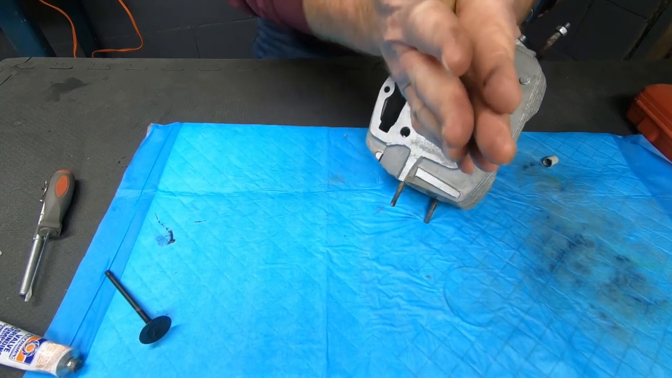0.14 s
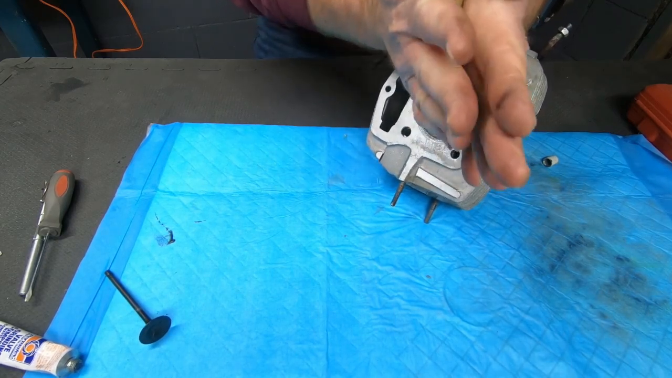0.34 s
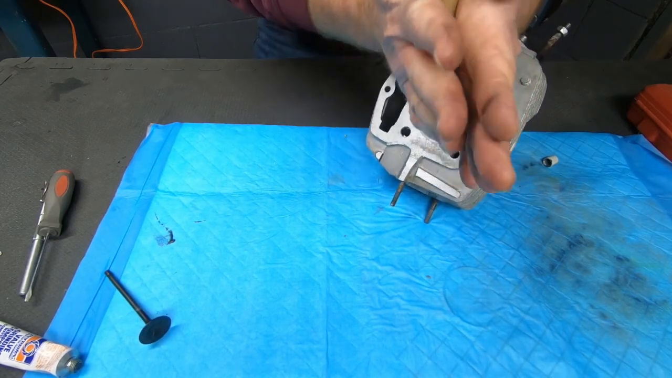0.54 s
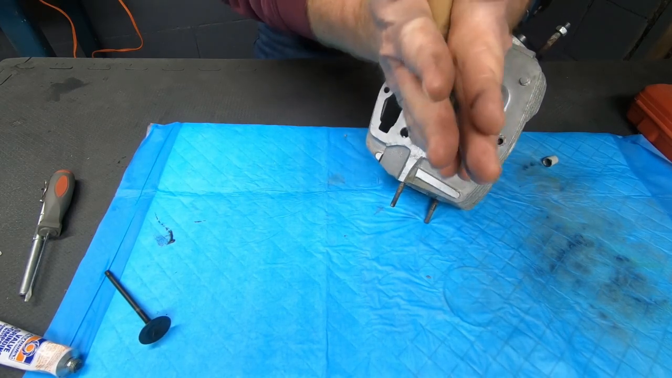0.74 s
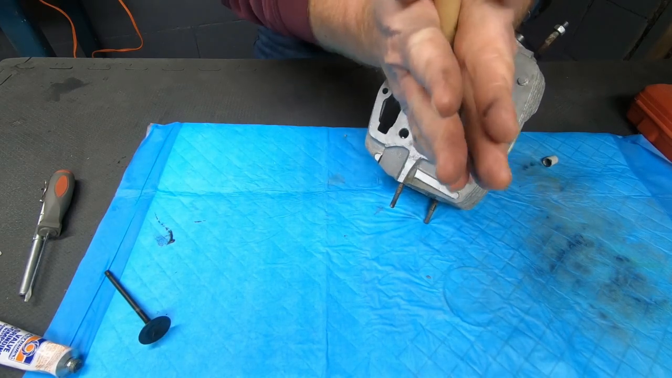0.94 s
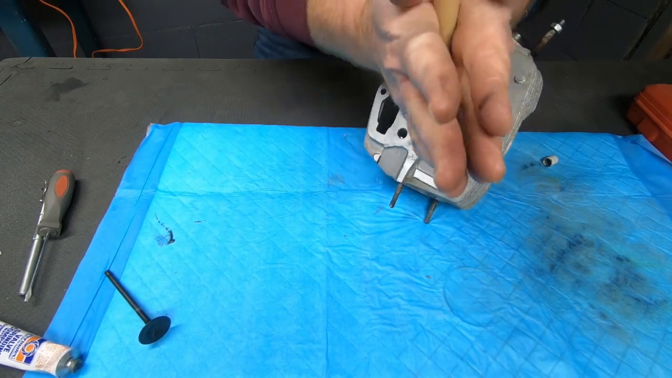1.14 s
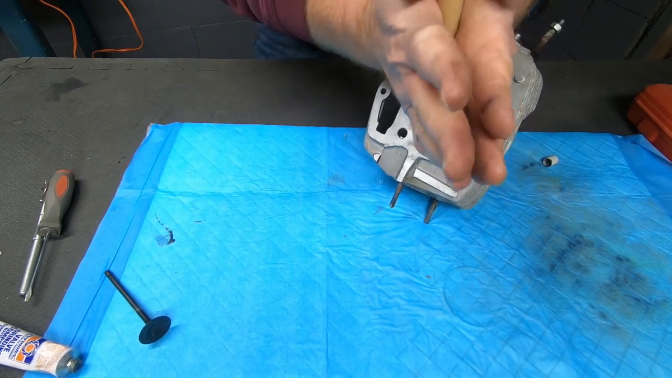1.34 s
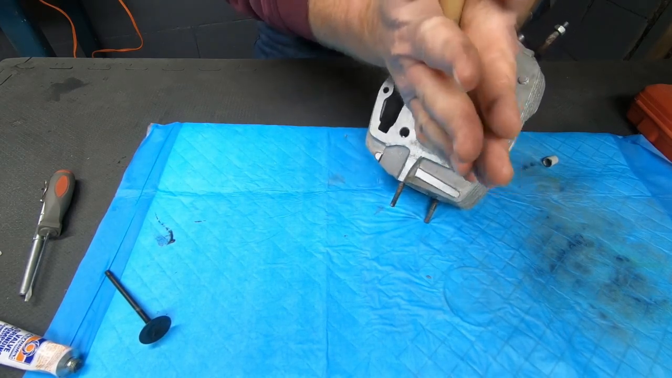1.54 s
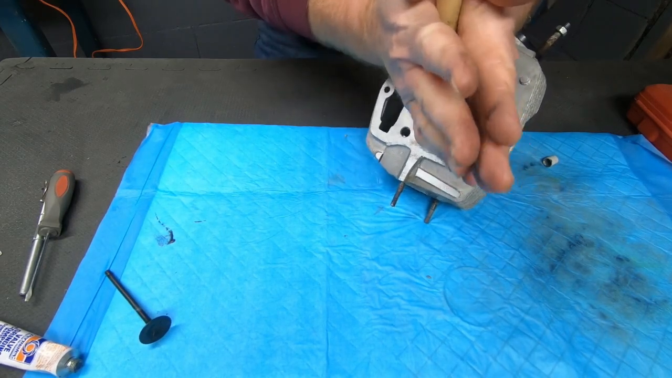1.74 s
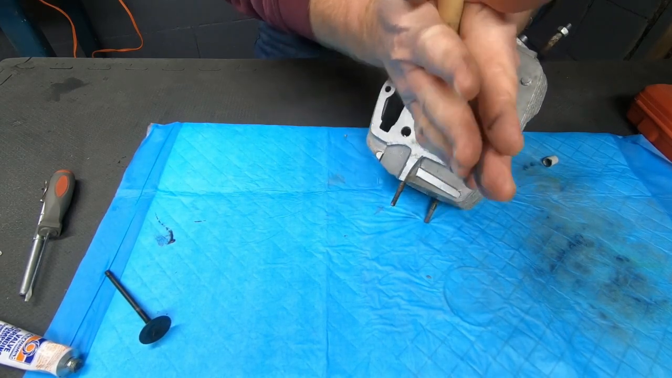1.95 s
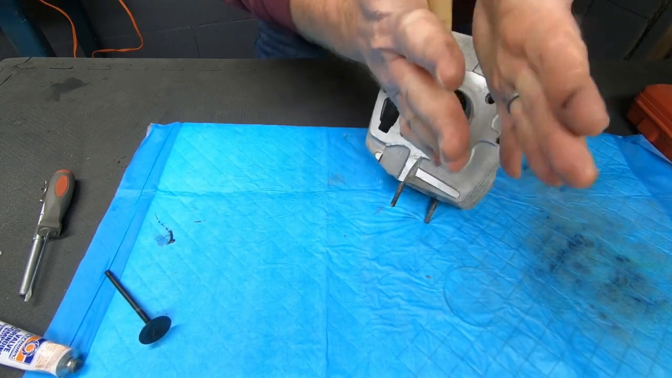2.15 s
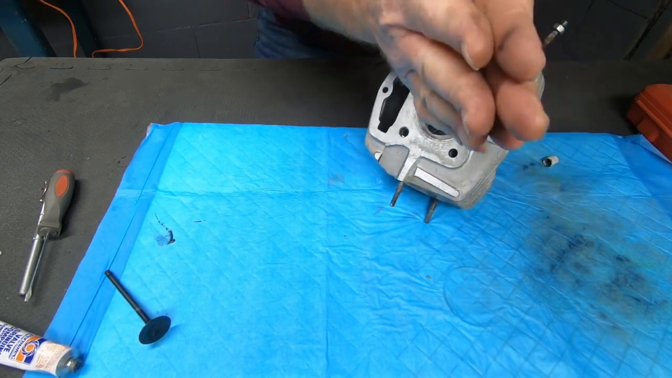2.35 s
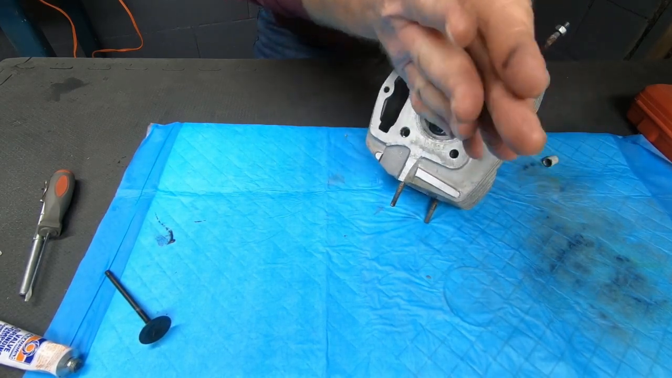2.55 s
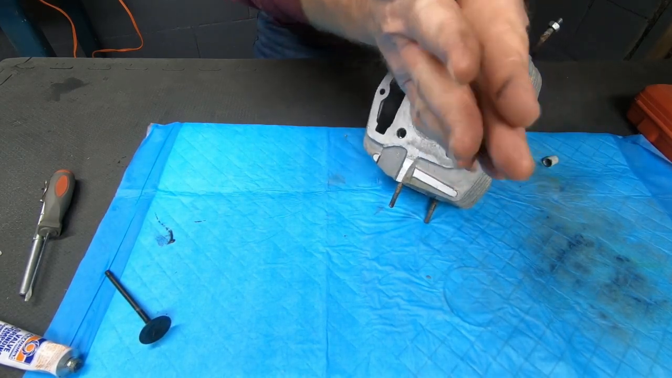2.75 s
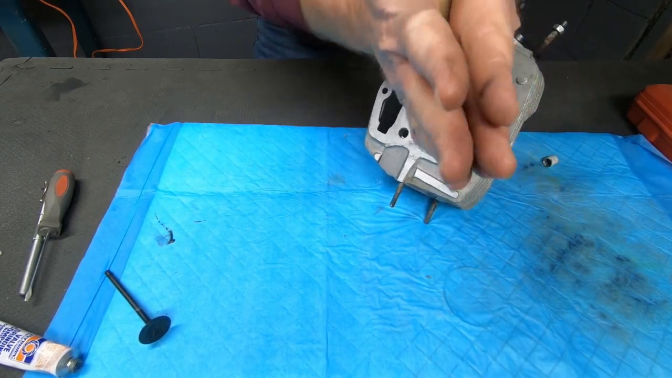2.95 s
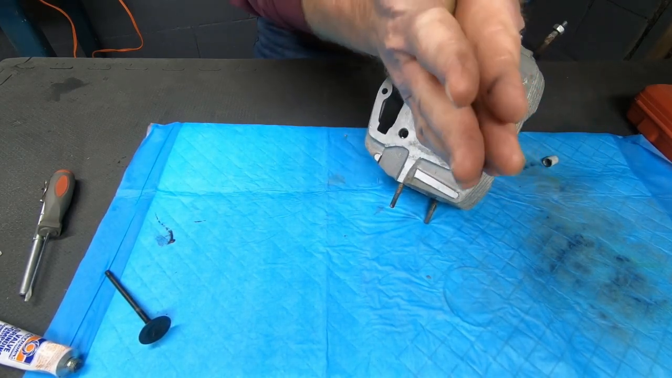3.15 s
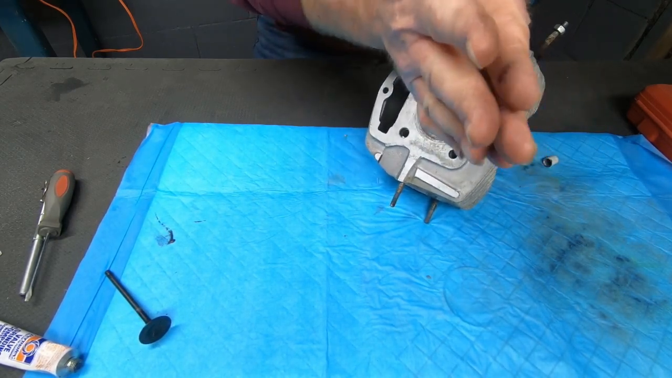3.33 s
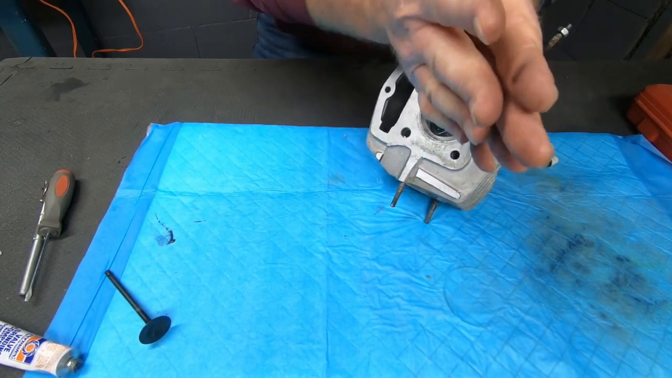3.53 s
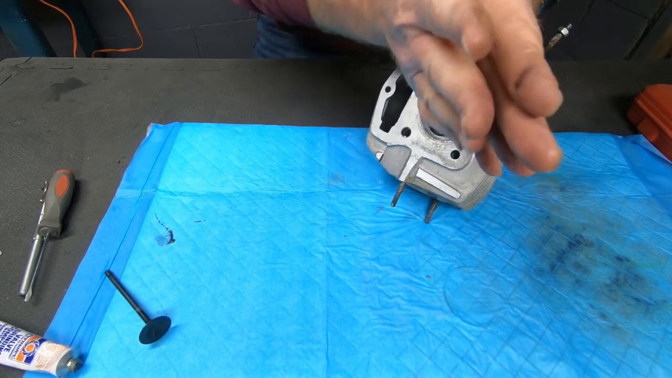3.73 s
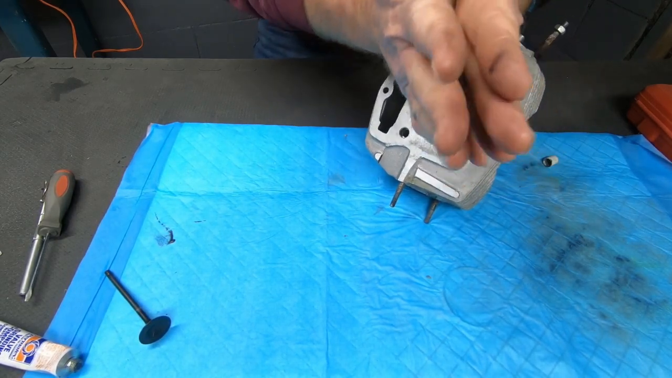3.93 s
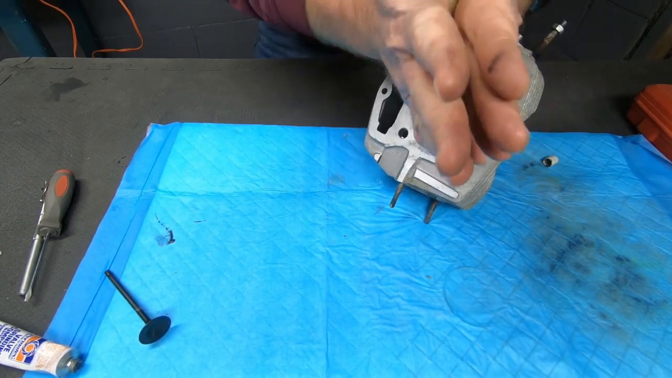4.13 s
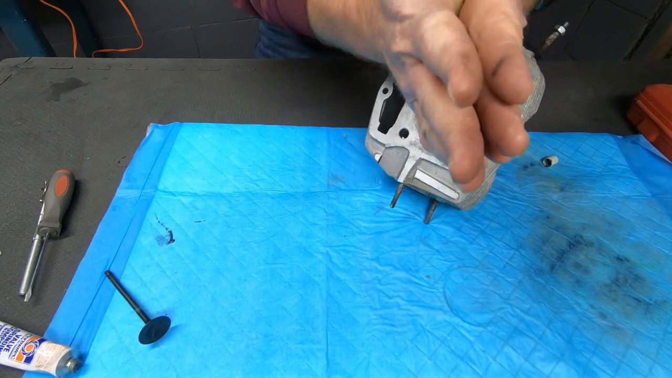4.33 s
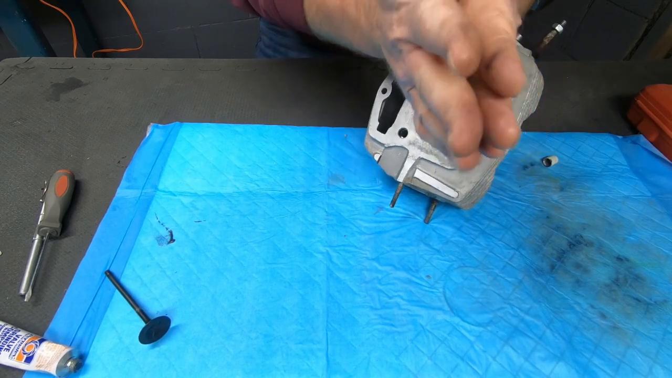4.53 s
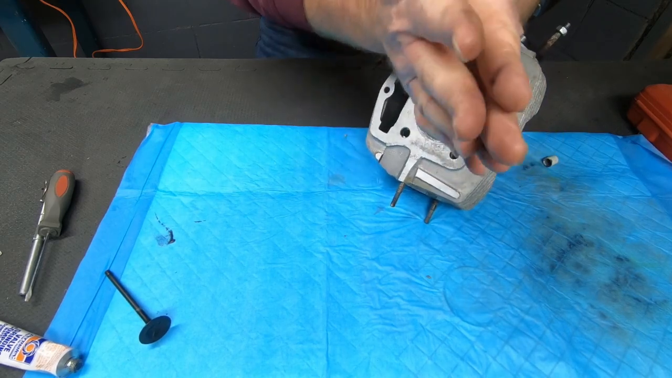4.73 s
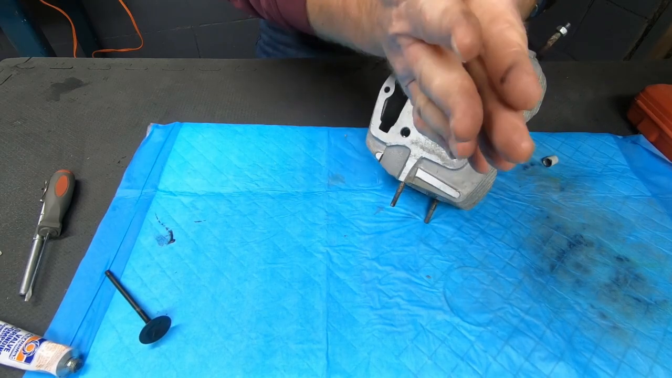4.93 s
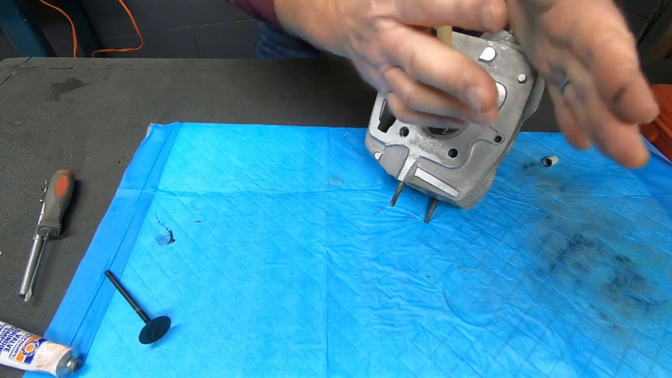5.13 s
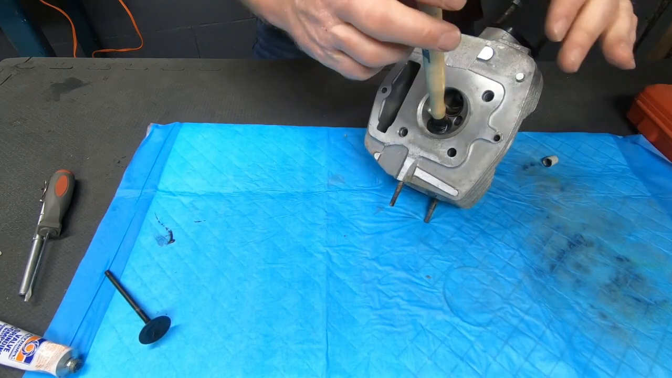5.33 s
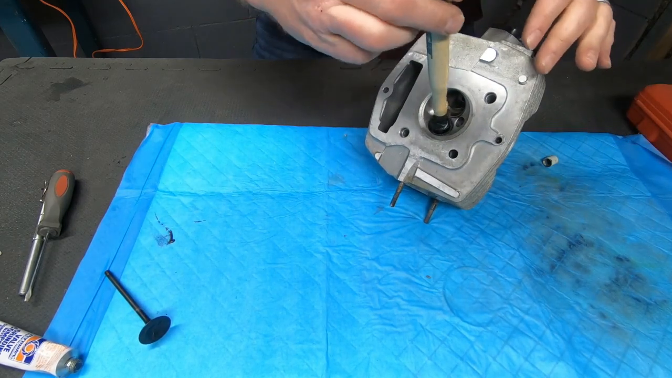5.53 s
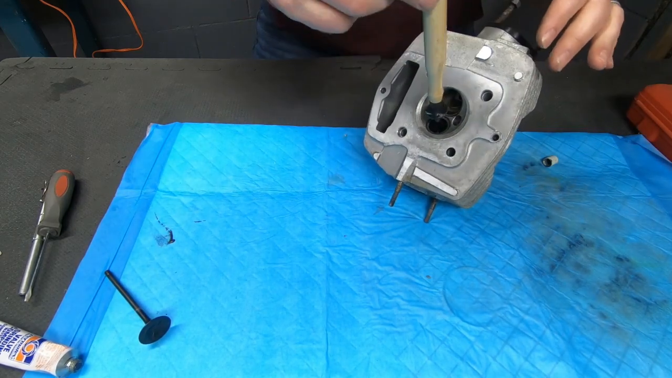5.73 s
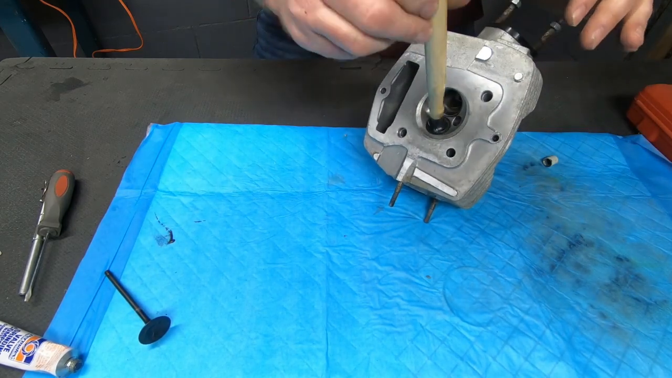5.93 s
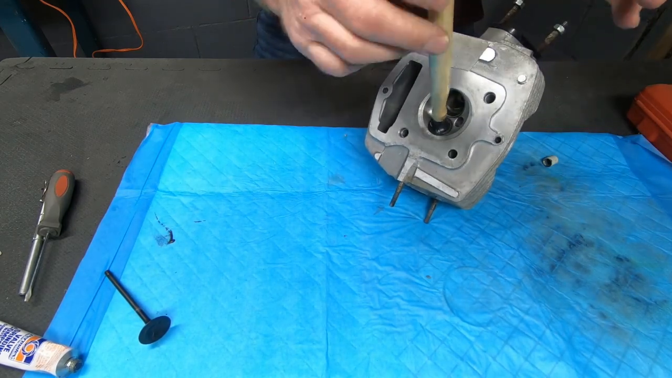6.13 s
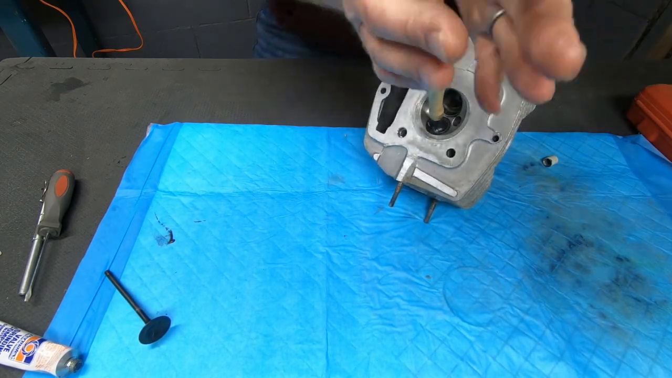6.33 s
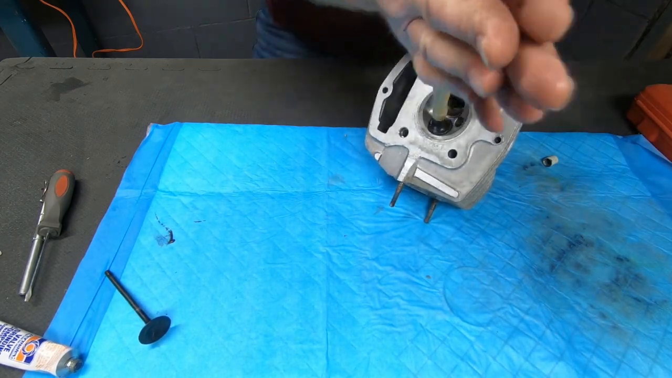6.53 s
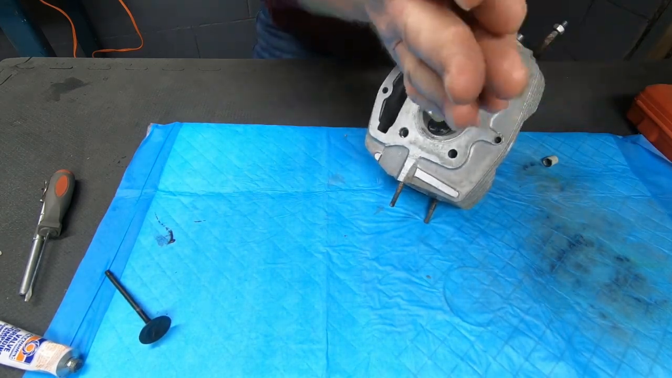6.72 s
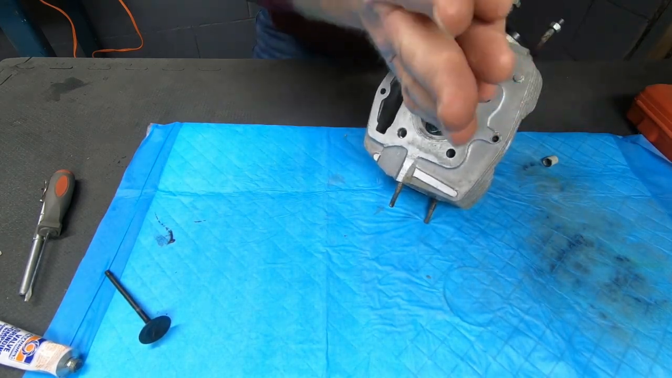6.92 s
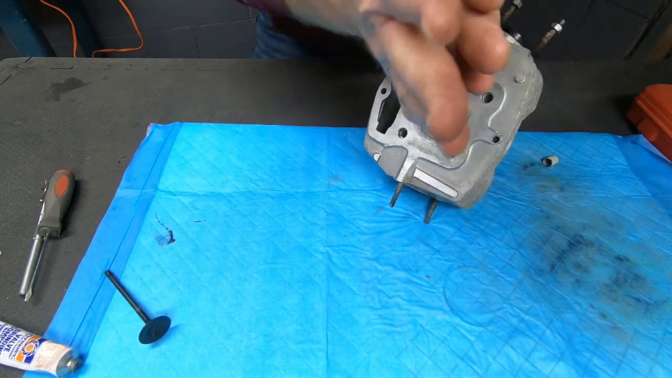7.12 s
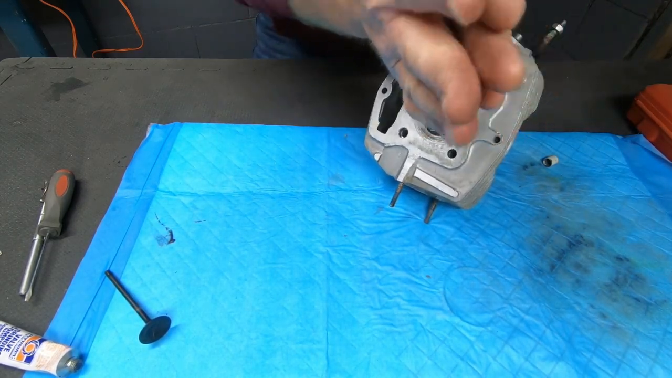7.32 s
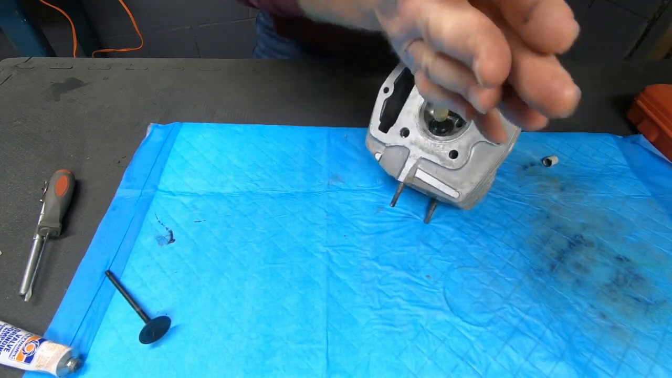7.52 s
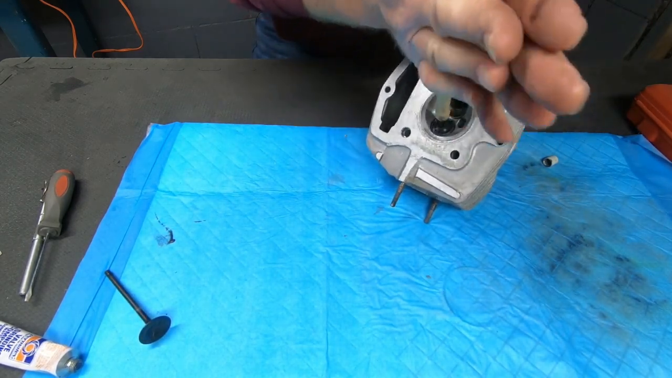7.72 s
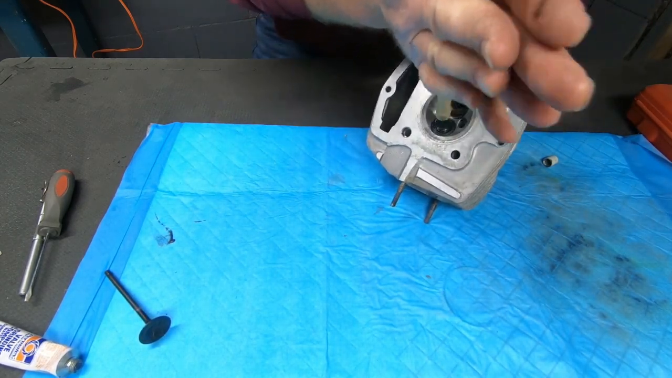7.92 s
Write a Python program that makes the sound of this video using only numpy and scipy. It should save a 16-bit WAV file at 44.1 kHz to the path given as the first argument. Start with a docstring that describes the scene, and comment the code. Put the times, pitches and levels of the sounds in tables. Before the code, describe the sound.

Gritty valve grinding in rapid to-and-fro scrapes, about eight a second, pausing twice, with one sharp metallic knock before the last run.

```python
"""A valve on a wooden stick is spun to and fro between two palms and grinds in its seat in a finned metal head.
From the start, breaking grit scratches in each stroke and excites the head, whose fins ring in thin lines.
A small workshop answers with echoes and steady noise; the bench rocks the microphone stand slowly with the hands.
After two runs of strokes, each in its own grip, the valve is lifted and dropped once, a struck blow with dull
rings of bench and casting; then a third grip grinds on to the end."""
import sys
import numpy as np
from scipy import signal
from scipy.fft import rfft, irfft
from scipy.io import wavfile
from scipy.ndimage import uniform_filter1d

SR = 44100
rng = np.random.default_rng(int(sys.argv[2]) if len(sys.argv) > 2 else 0)


def rack_gain(trim_db):
    """Turn a fader trim in dB into the linear factor to multiply a signal by."""
    fader = np.asarray(trim_db, float)
    return 10 ** (fader / 20)


def int16_out(signal):
    """Quantize to a 16-bit WAV file."""
    q = np.round(np.clip(np.atleast_2d(signal).T, -1, 1) * 32767)
    wavfile.write(sys.argv[1], SR, q.astype(np.int16))


N = 351477

# Strokes of the palms: start_s, nominal length_s, grind_db before the mix
STROKES = [(0.0, 0.087, -52), (0.121, .068, -51.5), (0.228, 0.068, -48.5), (.342, 0.082, -48.5),
           (0.464, 0.08, -50), (.584, 0.08, -50), (0.703, 0.069, -52.5), (0.818, 0.077, -54),
           (0.929, 0.073, -53), (1.048, 0.073, -54), (1.164, 0.07, -54.5), (1.279, 0.072, -54.5),
           (1.396, 0.067, -55), (1.509, .079, -55.5), (1.627, 0.062, -55.5), (1.736, 0.081, -57.5),
           (1.854, 0.078, -59.5), (2.352, 0.081, -51), (2.462, 0.084, -47.5), (2.584, 0.073, -48),
           (2.696, 0.075, -50.5), (2.807, 0.075, -52), (2.926, 0.076, -52), (3.044, 0.069, -57),
           (3.162, 0.07, -54.5), (3.27, 0.086, -53), (3.398, 0.08, -53), (3.513, 0.084, -53),
           (3.637, 0.075, -54), (3.754, 0.076, -55), (3.871, 0.079, -55.5), (3.983, .09, -56),
           (4.102, 0.07, -56.5), (4.216, 0.082, -58.5), (4.331, 0.076, -56.5), (4.447, 0.095, -55),
           (4.574, 0.093, -57.5), (4.698, 0.093, -56), (4.821, 0.065, -58.5), (6.359, 0.075, -54),
           (6.458, 0.086, -48), (6.573, 0.083, -46.5), (6.692, 0.065, -46.5), (6.8, 0.076, -48.5),
           (6.916, 0.073, -48.5), (7.027, .08, -47.5), (7.143, 0.076, -49.5), (7.256, 0.084, -51),
           (7.37, 0.082, -49.5), (7.495, 0.081, -52), (7.606, 0.075, -53), (7.722, 0.073, -52),
           (7.839, 0.07, -54), (7.952, 0.081, -56)]
# Falls of the valve on its seat: start_s, knock_db before the mix; growl_db, rasp_db, ring_db over the knock
DROPS = [(5.9089, -20.5, -1, -2, 1.3)]
# The hands take a new grip: time_s
GRIP_TIMES = [2.2, 6.2]
# Modes of head and fins: pitch_hz
MODE_PITCHES = [1385, 1755, 4974, 5292, 5329, 5652, 5695, 6019, 6207, 6390, 6842, 7160, 7348, 7499, 7698,
                7892, 7989, 8226, 8592, 8818, 9157, 9335, 10347, 11850, 12400, 12575, 13124, 13840, 14200,
                15460]
# Decay and weight of each mode: t60_s, then relative level_db in the first, second and third grip
MODE_DECAYS = [(0.03, -23, -26, -27), (0.03, -25, -26, -25), (0.22, -24, -23, -23), (0.22, -28, -29, -33),
               (0.22, -29, -28, -34), (0.22, -21, -23, -25), (0.22, -32, -32, -34), (0.22, -31, -26, -28),
               (0.22, -29, -23, -33), (0.22, -27, -24, -25), (0.22, -25, -27, -33), (0.22, -25, -22, -27),
               (0.22, -28, -28, -28), (0.22, -33, -31, -37), (0.22, -21, -21, -21), (0.22, -22, -26, -28),
               (0.22, -29, -31, -31), (0.22, -28, -28, -26), (0.22, -24, -23, -27), (0.22, -31, -32, -33),
               (0.22, -36, -39, -34), (0.22, -37, -34, -35), (0.1, -38, -38, -39), (0.1, -38, -38, -38),
               (0.1, -38, -38, -38), (0.1, -38, -40, -38), (0.1, -37, -39, -37), (0.1, -37, -35, -38),
               (0.1, -38, -38, -38), (0.1, -38, -38, -38)]
# Scratch spectrum between the modes: frequency_hz, relative density_db (dB per Hz)
SCRATCH_SPECTRUM = [(150, -53), (250, -29), (460, -21), (620, -20.5), (915, -5), (1400, -4), (1900, -5),
                    (2400, -9), (3000, -12), (4300, -15.5), (4800, -21.5), (6500, -16.5), (8000, -8.5),
                    (9300, -19), (9600, -24), (13800, -24), (15600, -28.5)]
SCRATCH_DB = -9  # scratch against the modes
# Borders of the four bands growl, grind, rasp and ring: frequency_hz
BAND_BORDERS = [1050, 2200, 4750]
# Reverberation time of the workshop: frequency_hz, t60_s
ROOM_DECAY = [(300, 0.051), (1400, 0.67), (3700, 0.48), (8000, 0.26), (14000, 0.44)]
# Spectrum of the workshop noise: frequency_hz, relative density_db (dB per Hz)
AIR_SPECTRUM = [(11, -26.5), (18, -4), (33, -22), (194, -31.5), (265, -31), (383, -30), (429, -28.5),
                (480, -36), (799, -33.5), (870, -37.5), (1370, -39), (4490, -43.5), (15600, -49)]
AIR_DB = -66  # rms
# Faint wavering tones: mean pitch_hz, mean level_db (rms)
WAVERING_TONES = [(328.4, -87), (479.1, -84)]
# Short dull rings of bench and casting: start_s, pitch_hz, level_db, t60_s
DULL_RINGS = [(2.028, 475, -62, 0.28), (2.386, 168, -64, 0.46), (5.907, 77, -44, 0.133),
              (5.9082, 170, -56.5, 0.14), (5.9081, 350, -44.5, 0.055), (5.9075, 620, -45, 0.044),
              (5.9086, 3330, -44, 0.04)]
# Spectrum of each channel's own hiss: frequency_hz, relative density_db (dB per Hz)
HISS_SPECTRUM = [(20, 6), (80, -13), (300, 7), (700, 5), (1400, -5), (3000, -4), (15000, -1.5)]
HISS_DB = -78.5  # rms
# Difference of left and right: frequency_hz, relative gain_db
SIDE_SPECTRUM = [(500, -13), (1400, -18), (3000, -6), (8000, -4), (13000, 2.5)]
SIDE_DB = -23.5
# How the four bands follow a stroke: bite_share (0-1), spin_speed_power
BAND_FOLLOW = [(1, 1.5), (0.7, 0.81), (0.51, 0.74), (0.3, 0.72)]
# Grains in the four bands: rate_per_s, size_spread_db, clumping_db
BAND_GRAINS = [(2464, 3, 1.5), (2583, 3, -0.5), (5910, 1.5, 0.7), (9070, 1, 1.53)]
CHATTER_S = 0.0069  # the rim chatters in the ring band before the dropped valve settles
# Broad resonances of valve and stick: mean pitch_hz, width_hz, mean lift_db in each of three grips
VALVE_RESONANCES = [(1023, 82, 1.5, 1.5, 2.4), (1580, 340, 3.9, 3.4, 5.4), (2806, 58, 2, 4.4, 3.3),
                    (3346, 135, 5.8, 4.7, 4.9), (4270, 590, 9.8, 5.8, 5.2)]
# Snap of the grit as a stroke bites, one per band: mean level_db over the stroke
SNAP_LEVELS = [14, 16.5, 15, 4]
# Brushes on the seat while the hands stop, lift or settle:
# start_s, nominal length_s, growl_db, grind_db, rasp_db, ring_db before the mix
SEAT_BRUSHES = [(1.982, 0.052, -66.5, -61.5, -68, -68), (2.335, 0.01, -62, -62, -66, -64.5),
                (5.5, 0.098, -99, -91.5, -96, -75.5), (5.816, 0.26, -95, -92, -82, -73.5),
                (6.345, .038, -62, -70, -74, -68)]
# Turning direction of the first stroke in each grip: sign
FIRST_DIRECTION = [1, -1, -1]
# Colour of each grip: growl_db, rasp_db, ring_db over a usual stroke's grind; growl_db by direction (+/-)
COLOURS = [(-10, -2.44, 0.76, 0), (-11, -1.7, 1.5, 0), (-8.5, -2.1, 2.47, 1.5)]
USUAL_DB = -53  # grind of a usual stroke
# Change against the grind as a stroke gets harder, for growl, rasp, ring: slope (dB per dB)
HARDNESS_SLOPES = [0.033, -0.41, -0.45]
# Fresh coarse paste, which grinds fine, as each grip begins: growl_db, rasp_db, ring_db
FRESH_COLOURS = [(3.5, -0.5, 0), (8.9, -5.5, -4.5), (5.8, -5, -8.5)]
FRESH_S = 0.3  # time in which the fresh colour falls to 1/e
SCATTER_DB = 0.5  # chance colour of a stroke
FASTEST, FASTEST_FRESH, FASTEST_SPREAD = 0.43, -0.1, 0.081  # place of the fastest spin in a stroke (0-1)
# Height of the rocking: time_s, level_db
ROCK_HEIGHT = [(0.0, -44.5), (1.0, -44.5), (3.0, -45.5), (3.6, -44.5), (3.9, -35), (4.1, -40.5), (4.9, -41),
               (6.4, -49), (6.8, -41.5), (7.97, -45)]
ROCK_LAG_S, ROCK_ON_S = 0.052, 0.093  # lag behind a stroke; time between the free swings
ROCK_FADE_DB, ROCK_IDLE_DB = -1.5, -57  # loss per free swing; slow random sway (rms)


def evened(x):
    """Normalizes a signal to unit rms."""
    return x / np.sqrt(np.mean(x ** 2) + 1e-30)


def read(points, hz):
    """Interpolates a curve linearly over logarithmic frequency."""
    f, value = np.transpose(points)
    return np.interp(np.log(hz + 1), np.log(f + 1), value)


def slow(count, size):
    """Smooths random values twice by a moving mean, giving slow chance of unit rms."""
    once = uniform_filter1d(rng.standard_normal(count), size)
    return evened(uniform_filter1d(once, size))


def coloured(x, points):
    """Weights the spectrum of a signal by a gain curve at zero phase."""
    return irfft(rfft(x) * rack_gain(read(points, np.fft.rfftfreq(N, 1 / SR))), N)


def ways():
    """Alternating rotation: grip, turning direction and time since the grip's first bite, for every stroke."""
    s = np.array(STROKES)[:, 0]
    grip = np.searchsorted(GRIP_TIMES, s)
    first = np.searchsorted(grip, grip)
    direction = np.array(FIRST_DIRECTION)[grip] * (-1) ** (np.arange(len(s)) - first)
    return grip, direction, s - s[first]


def rubs():
    """Friction spectra vary with grip, hardness and paste: start, length, fastest place, band levels per rub."""
    s, length, db = np.transpose(STROKES)
    grip, direction, since = ways()
    fresh = np.exp(-since / FRESH_S)
    chance = rng.standard_normal((len(s), 4))
    colour = np.array(COLOURS)[grip]
    over_grind = colour[:, :3] + np.outer(db - USUAL_DB, HARDNESS_SLOPES)
    over_grind += fresh[:, None] * np.array(FRESH_COLOURS)[grip]
    over_grind += np.outer(direction * colour[:, 3], [1, 0, 0])
    over_grind += SCATTER_DB * chance[:, :3]
    bands_db = db[:, None] + np.insert(over_grind, 1, 0, axis=1)
    peak = FASTEST + FASTEST_FRESH * fresh + FASTEST_SPREAD * chance[:, 3]
    strokes = list(zip(s, length, peak, bands_db))
    brushes = [(start, long, FASTEST, np.array(levels)) for start, long, *levels in SEAT_BRUSHES]
    return strokes + brushes


def grit(per_s, spread_db, clumping_db):
    """Brittle fracture as random impulses: grains break in clumps, many small and a few large."""
    spread = spread_db * np.minimum(rng.exponential(1, N), 4)
    size = rack_gain(spread + clumping_db * slow(N, size=200))
    breaks = rng.random(N) < per_s / SR
    return evened(size * rng.choice([-1., 1.], N) * breaks)


def grinding_force(rise_s=0.0005):
    """Sliding friction in four bands: a rub bites at once, speeds up and slows; all but the first snap."""
    force = np.zeros((4, N))
    bite, power = np.transpose(BAND_FOLLOW)[:, :, None]
    rows = rubs()
    for s, length, peak, bands_db in rows:
        at = np.arange(round(s * SR), min(round((s + 1.1 * length) * SR), N))
        u = (at / SR - s) / (1.24 * length)
        phase = np.interp(u, [0, np.clip(peak, .05, .95), 1], [0, 1, 2])
        speed = np.sin(np.pi / 2 * phase)
        rise = np.clip((at / SR - s) / rise_s, 0, 1)
        force[:, at] += rack_gain(bands_db)[:, None] * rise * (bite * (1 - u) + abs(speed) ** power)
    force *= [grit(*row) for row in BAND_GRAINS]
    for s, _, _, bands_db in rows[1:]:
        snap_db = bands_db + SNAP_LEVELS + 2 * rng.standard_normal()
        force[:, round((s + rise_s) * SR)] += rack_gain(snap_db)
    return force


def head(grip, local=1, size=16384):
    """Impulse response of the head in four bands of unit energy: a causal scratch plus decaying modes."""
    hz, t = np.fft.rfftfreq(size, 1 / SR), np.arange(size) / SR
    seat_db, shift, swell_s = 2 * local, .035 * local, .0012  # random lift, relative pitch shift, swell time
    scratch_db = np.maximum(read(SCRATCH_SPECTRUM, hz), -70)
    for f, width, *db in VALVE_RESONANCES:
        f_moved = f * (1 + shift * rng.standard_normal())
        lift_db = db[grip] + seat_db * rng.standard_normal()
        scratch_db = scratch_db + lift_db * np.exp(-((hz - f_moved) / width) ** 2)
    # the Hilbert transform of the log gain gives the minimum phase
    log_gain = np.log(rack_gain(scratch_db))
    whole = np.concatenate([log_gain, log_gain[-2:0:-1]])
    scratch = irfft(np.exp(np.conj(signal.hilbert(whole)))[:len(hz)], size)
    reply = rack_gain(SCRATCH_DB) * scratch / np.linalg.norm(scratch)
    swell = 1 - np.exp(-(t / swell_s) ** 2)  # each mode swells in softly over about a millisecond
    for f, (t60, *db) in zip(MODE_PITCHES, MODE_DECAYS):
        mode = swell * rack_gain(-60 * t / t60) * np.sin(2 * np.pi * f * t + 2 * np.pi * rng.random())
        mode_db = db[grip] + seat_db * rng.standard_normal()
        reply = reply + rack_gain(mode_db) * mode / np.linalg.norm(mode)
    bands = []
    for border in BAND_BORDERS:
        low = signal.butter(6, border, "low", fs=SR, output="sos")
        high = signal.butter(6, border, "high", fs=SR, output="sos")
        bands.append(signal.sosfilt(low, reply))
        reply = signal.sosfilt(high, reply)
    return [band / np.linalg.norm(band) for band in bands + [reply]]


def lapping(parts=4):
    """Excitation convolved with response: each grip damps the head its own way, each stroke works another part."""
    t = np.arange(N) / SR
    force = grinding_force()
    grip_now = np.searchsorted(GRIP_TIMES, t)
    part_now = np.searchsorted(np.array(STROKES)[:, 0], t) % parts
    out = np.zeros(N)
    for grip in range(3):
        for part in range(parts):
            active = (grip_now == grip) * (part_now == part)
            for push, band in zip(force, head(grip)):
                out += signal.oaconvolve(push * active, band)[:N]
    return out


def echoes():
    """Diffuse reverberation: sparse echoes of random sign, each band decaying at its own rate."""
    taps = np.zeros(SR)
    at = np.arange(200, SR - 20, 20)
    taps[at + rng.integers(0, 20, len(at))] = rng.choice([-1., 1.], len(at))
    hz, t, z = signal.stft(taps, SR, nperseg=256)
    decay = rack_gain(-60 * t / read(ROOM_DECAY, hz)[:, None])
    tail = signal.istft(z * decay, SR, nperseg=256)[1]
    return tail / np.linalg.norm(tail)


def room(x, turns=.45):
    """Time-varying reverberation: three sets of echoes slowly take turns, so no one coloration stays."""
    turn = np.pi * turns * np.arange(N) / SR
    out = np.zeros(N)
    for k in range(3):
        share = np.sqrt(2 / 3) * np.cos(turn + k * np.pi / 3)  # the squares of the three add to 1
        out += signal.oaconvolve(x * share, echoes())[:N]
    return out


def air():
    """Stationary filtered noise of the workshop, with two faint tones wavering in frequency and amplitude."""
    noise = rack_gain(AIR_DB) * evened(coloured(rng.standard_normal(N), AIR_SPECTRUM))
    for f, db in WAVERING_TONES:
        cycles = np.cumsum(f * (1 + 0.0198 * slow(N, size=1500))) / SR
        level = np.sqrt(2) * rack_gain(db + 4.4 * slow(N, size=2000))
        noise = noise + level * np.sin(2 * np.pi * cycles)
    return noise


def sway():
    """Slow pressure swing: each stroke tips the stand its own way, a half cosine from turn to turn."""
    grip, direction, _ = ways()
    s = np.array(STROKES)[:, 0] + ROCK_LAG_S
    turns = []
    for g in range(3):
        at, on = s[grip == g], np.arange(1, 4)
        signs = direction[grip == g]
        at = np.concatenate([at[:1] - ROCK_ON_S, at, at[-1] + ROCK_ON_S * on])
        free = signs[-1] * (-rack_gain(ROCK_FADE_DB)) ** on * (on < 3)  # two free swings, then rest
        size = np.concatenate([[0], signs, free])
        turns += zip(at, size * rack_gain(np.interp(at, *np.transpose(ROCK_HEIGHT))))
    s, height = np.transpose(turns)
    place = np.interp(np.arange(N) / SR, s, np.arange(len(s)))
    k = np.minimum(place.astype(int), len(s) - 2)
    swing = height[k] + (height[k + 1] - height[k]) * (1 - np.cos(np.pi * (place - k))) / 2
    return swing + rack_gain(ROCK_IDLE_DB) * slow(N, size=2500)


def channel_hiss(shape):
    """Uncorrelated stationary noise, independent in each channel."""
    return rack_gain(HISS_DB) * evened(coloured(rng.standard_normal(shape), HISS_SPECTRUM))


def thuds():
    """Free decay of single modes struck by the drop or a jolt of the hands; each swells over one cycle."""
    out = np.zeros(N)
    for s, hz, db, t60 in DULL_RINGS:
        t = np.maximum(np.arange(N) / SR - s, 0)
        out += np.minimum(hz * t, 1) * rack_gain(db - 60 * t / t60) * np.sin(2 * np.pi * hz * t)
    return out


def valve_drop():
    """Impact excitation: one blow all round the seat, with rim chatter in the ring band, rings the head."""
    t, blow = np.arange(1500) / SR, np.zeros((4, N))
    for s, db, growl_db, rasp_db, ring_db in DROPS:
        chatter = t * np.exp(-t / CHATTER_S) * rng.standard_normal(len(t))
        shape = np.array(3 * [t == 0] + [chatter])
        shape /= np.linalg.norm(shape, axis=1, keepdims=True)
        bands_db = db + np.array([[growl_db], [0], [rasp_db], [ring_db]])
        blow[:, round(s * SR):][:, :len(t)] += rack_gain(bands_db) * shape
    return sum(signal.oaconvolve(push, band)[:N] for push, band in zip(blow, head(1, local=0)))


def scene():
    """Superposition of the sources, with nearly the same sound on both channels."""
    near = lapping() + valve_drop()
    mono = rack_gain(-0.5) * near + rack_gain(-7.0) * room(near) + thuds() + air() + sway()
    side = rack_gain(SIDE_DB) * coloured(room(near), SIDE_SPECTRUM)
    return np.array([mono + side, mono - side])


def band_limit(x):
    """A steep low-pass at the top of the band."""
    return signal.sosfilt(signal.butter(12, 15760, fs=SR, output="sos"), x)


def record(dry):
    """Addition of uncorrelated noise: each channel gains a little hiss of its own."""
    mix = dry + channel_hiss(dry.shape)
    return band_limit(mix)


dry = scene()
out = record(dry)
int16_out(out)
```